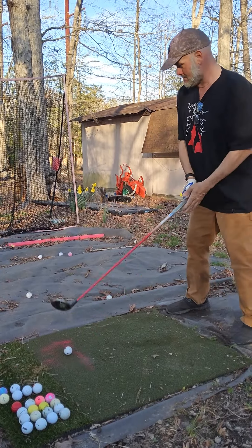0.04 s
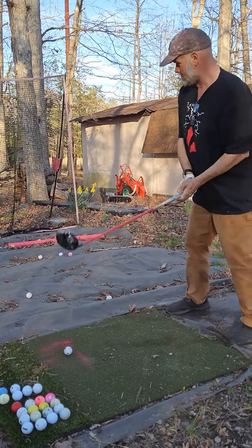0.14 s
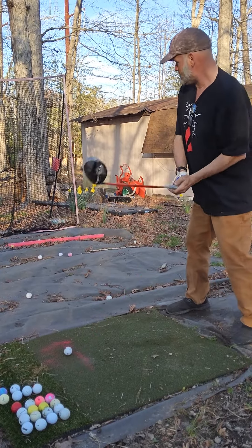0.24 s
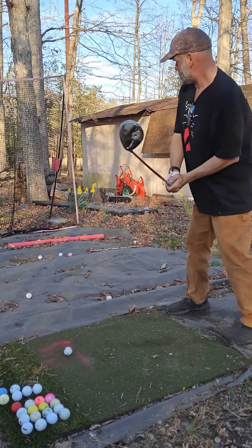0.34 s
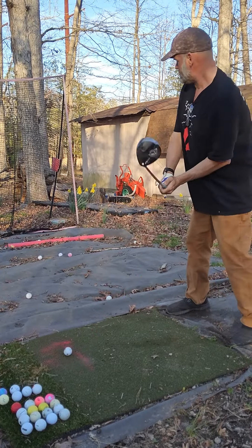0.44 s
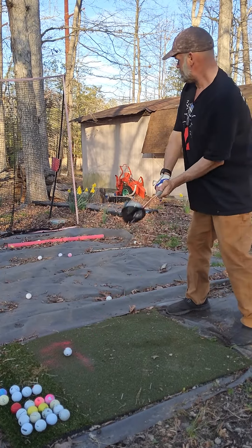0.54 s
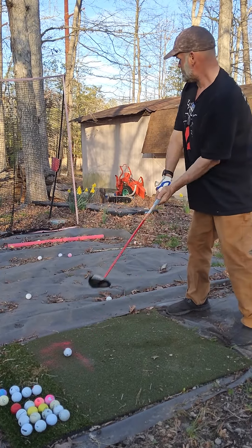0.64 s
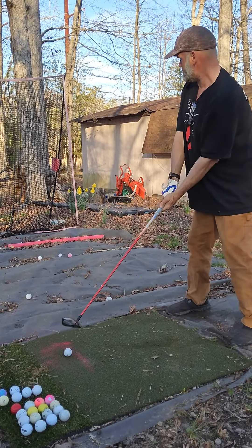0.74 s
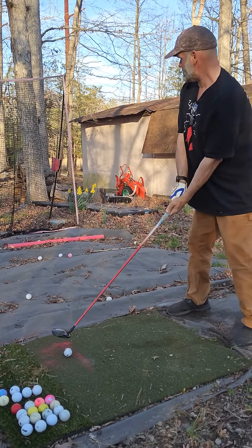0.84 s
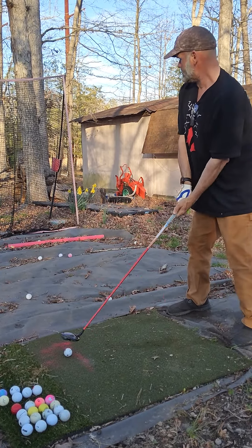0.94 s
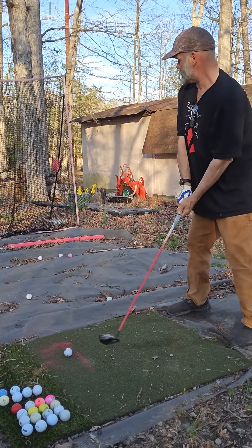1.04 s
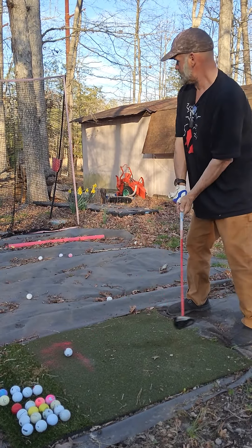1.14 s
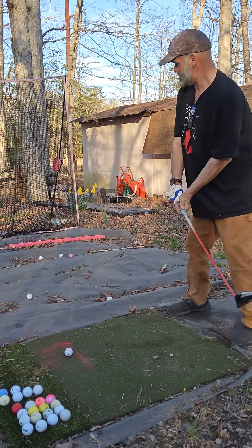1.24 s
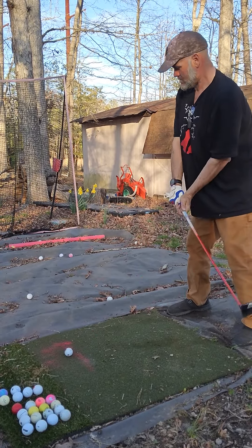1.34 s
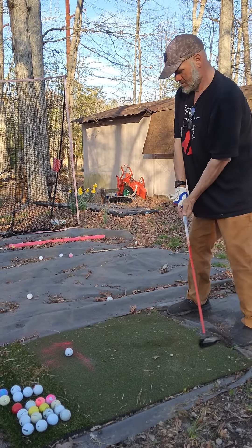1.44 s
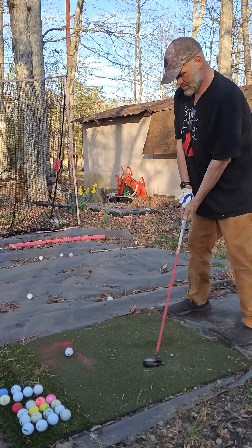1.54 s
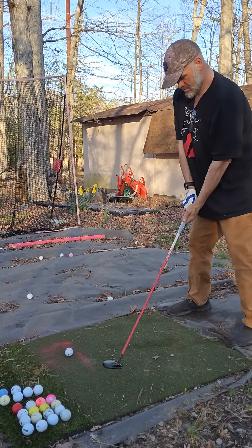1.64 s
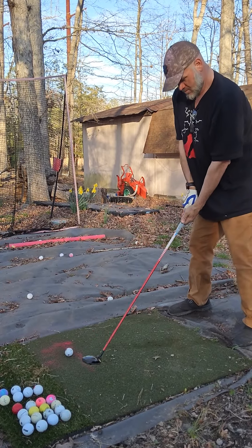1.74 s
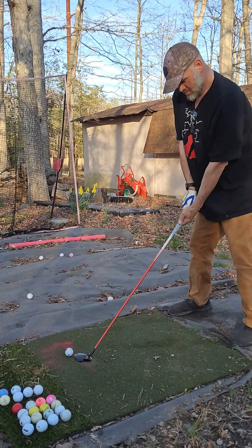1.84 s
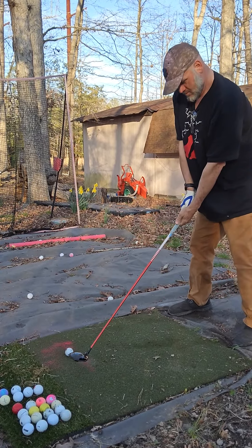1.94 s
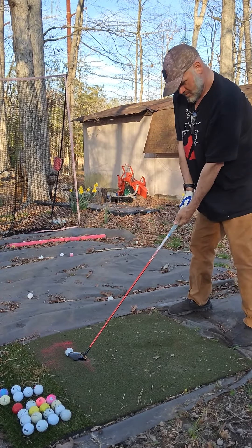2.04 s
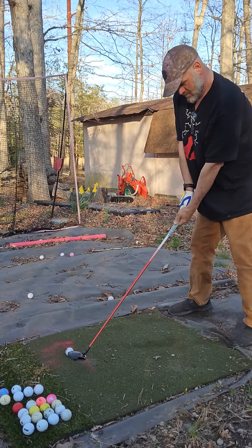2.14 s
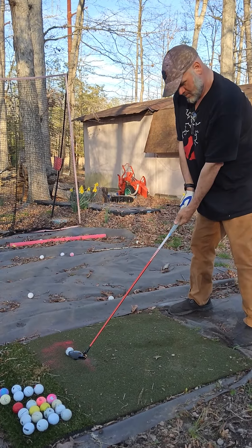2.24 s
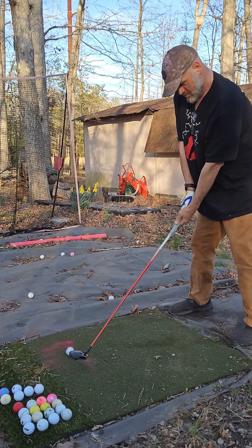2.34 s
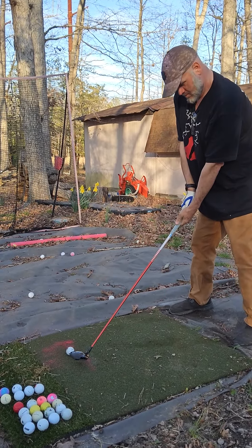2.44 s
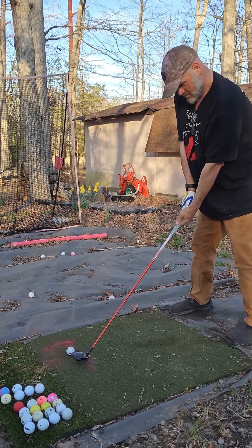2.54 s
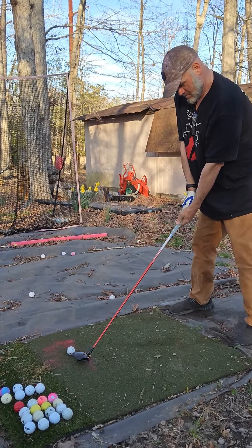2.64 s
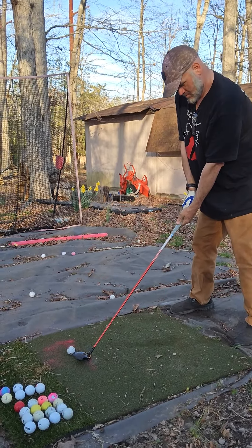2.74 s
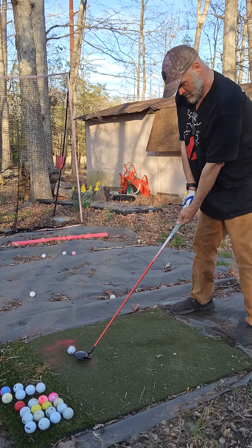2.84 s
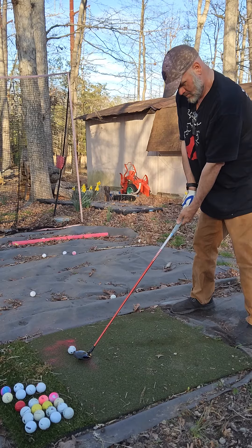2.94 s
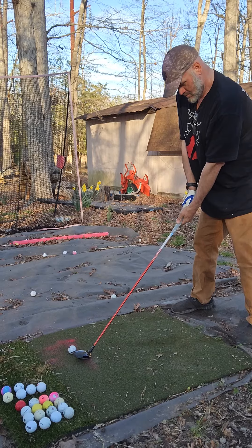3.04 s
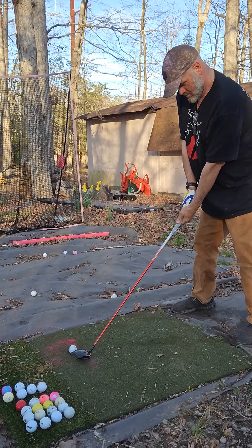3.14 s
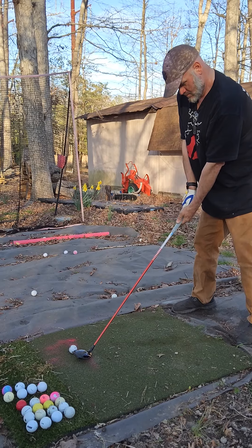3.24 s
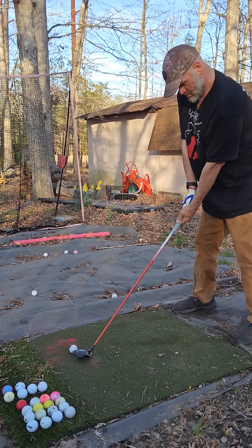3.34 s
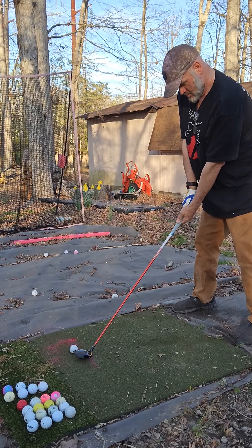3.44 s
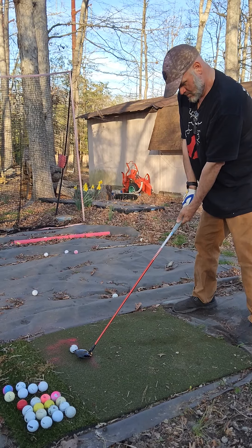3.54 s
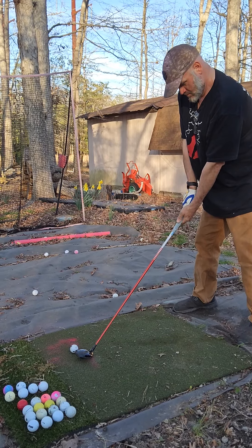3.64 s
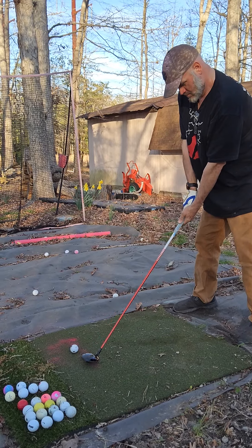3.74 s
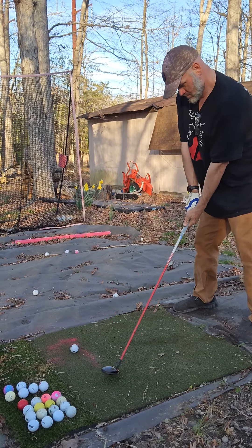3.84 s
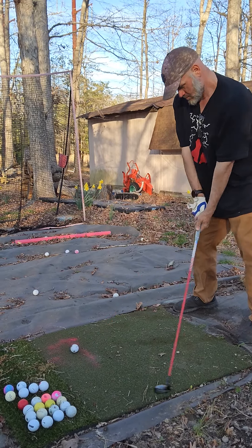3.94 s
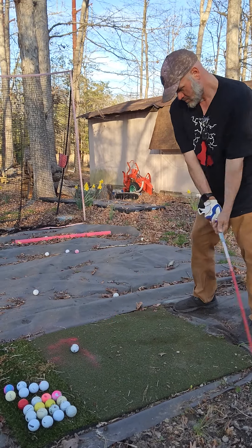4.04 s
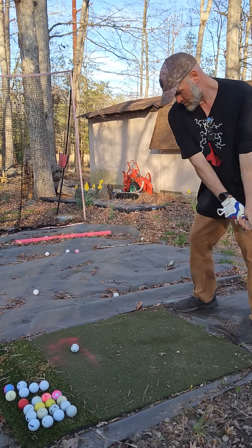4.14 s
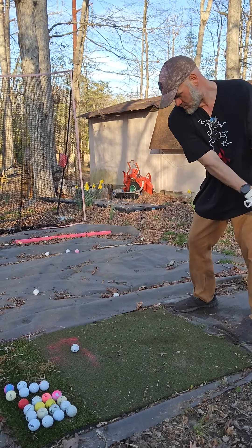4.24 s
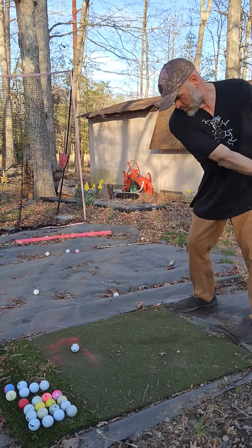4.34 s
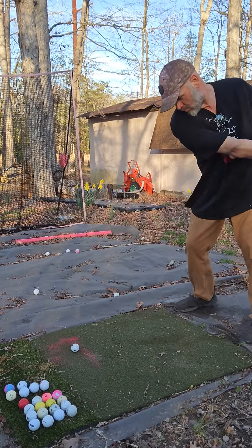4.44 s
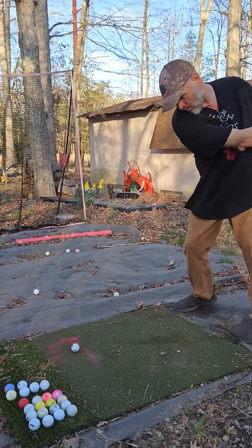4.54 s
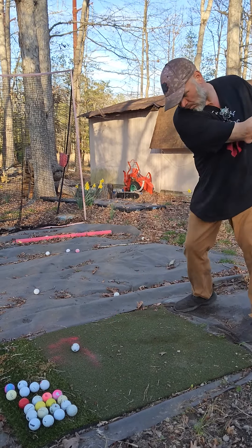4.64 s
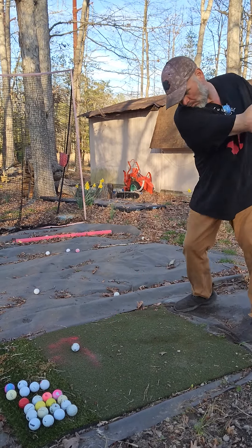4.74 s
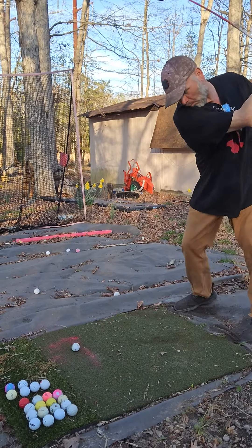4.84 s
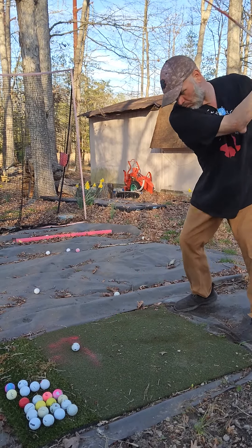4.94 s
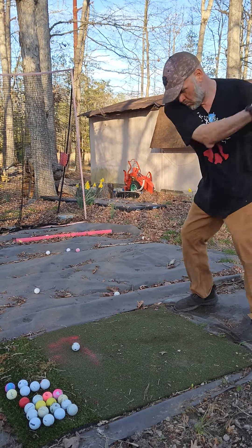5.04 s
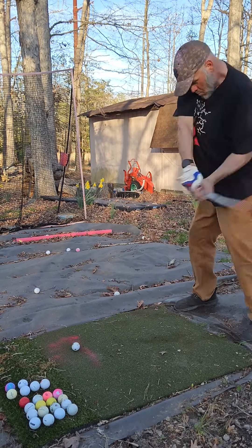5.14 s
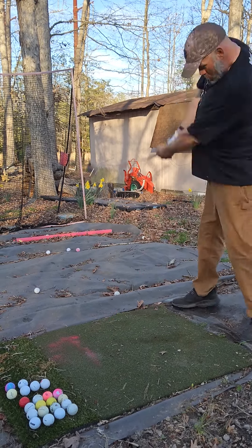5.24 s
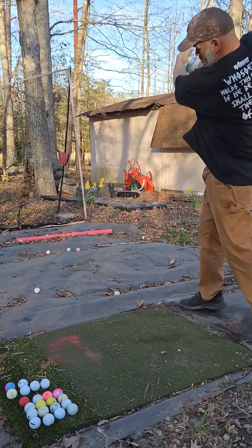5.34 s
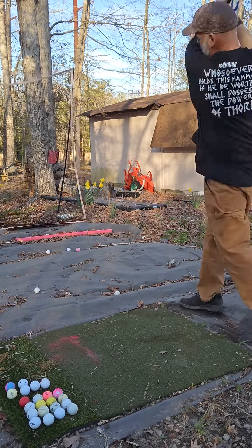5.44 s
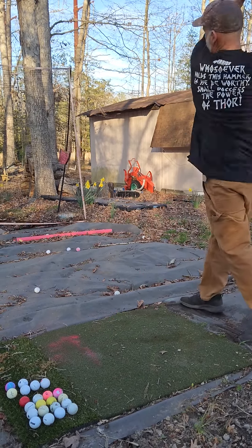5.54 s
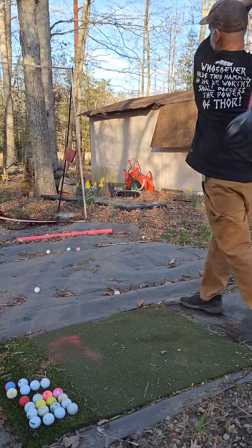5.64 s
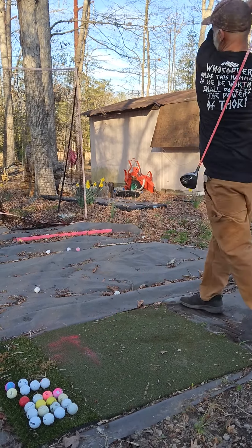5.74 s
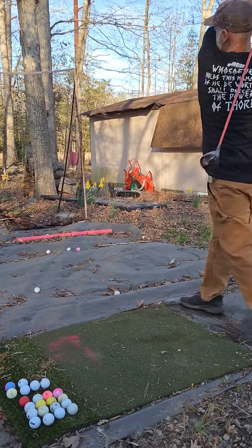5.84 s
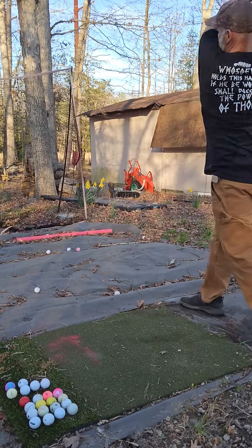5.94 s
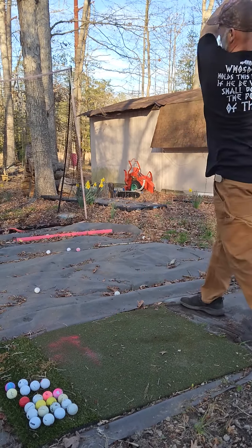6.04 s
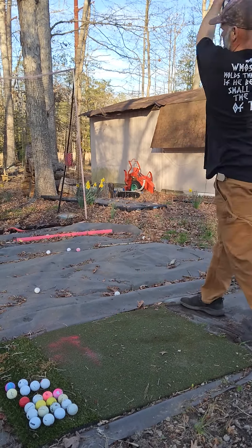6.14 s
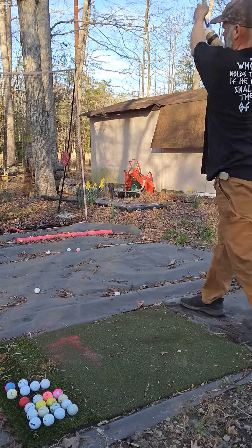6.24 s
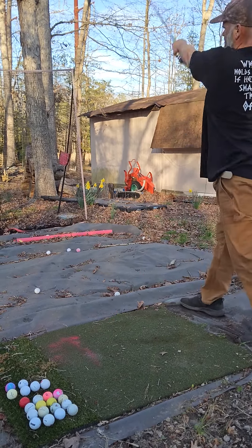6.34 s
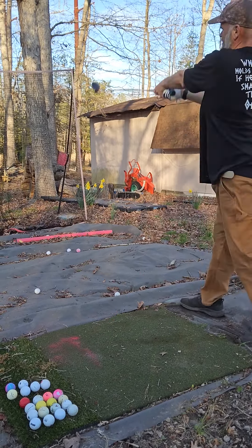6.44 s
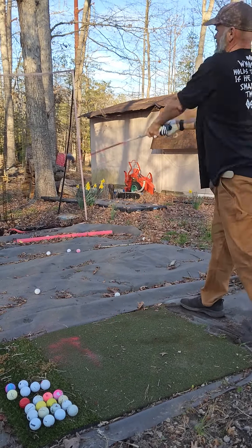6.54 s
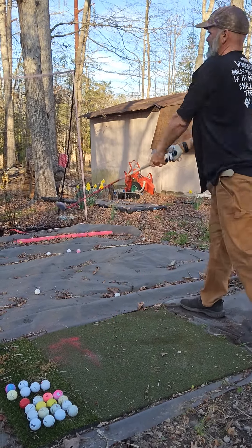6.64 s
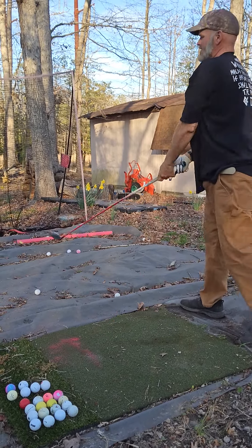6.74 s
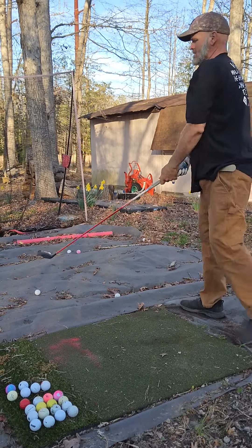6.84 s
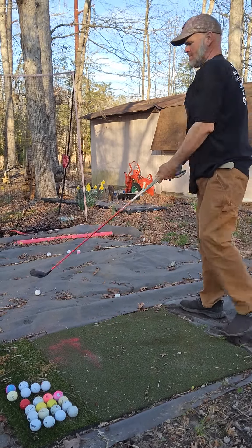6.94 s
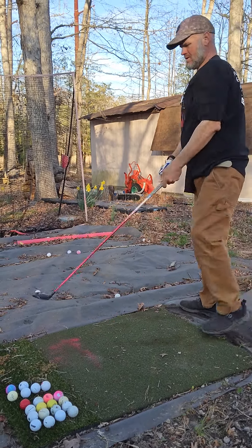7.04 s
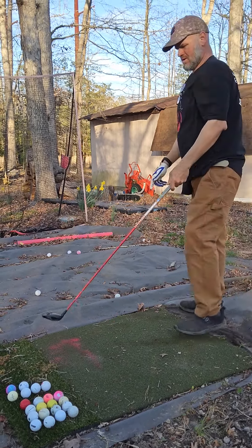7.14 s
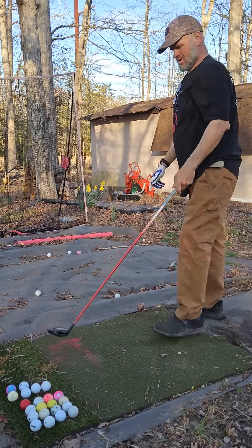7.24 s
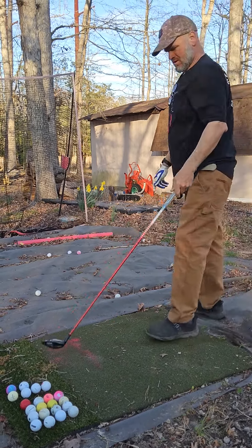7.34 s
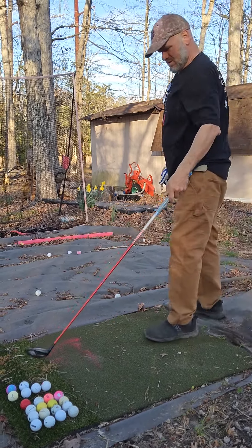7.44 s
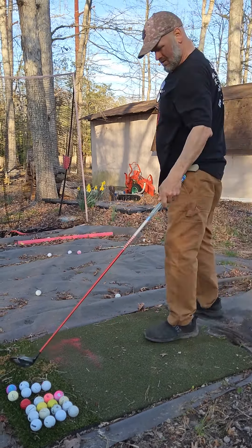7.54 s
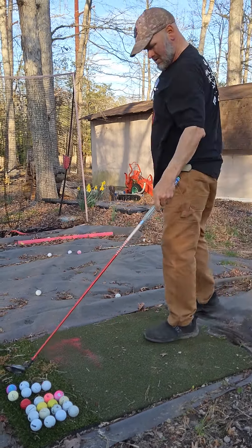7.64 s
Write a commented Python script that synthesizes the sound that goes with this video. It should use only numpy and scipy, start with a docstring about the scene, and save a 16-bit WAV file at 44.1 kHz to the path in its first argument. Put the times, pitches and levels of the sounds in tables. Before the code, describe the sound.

Faint birdsong and far-off traffic, then a quick golf swing, one sharp crack and a ball thumping into a rustling practice net.

```python
"""A golf club cracks a ball off a mat into a practice net in a wooded backyard.
The shaft whistles as it sheds vortices, the head thumps the mat, and the hit sets the hollow head ringing.
The net takes the ball with dull blows, rustles and lets it drop; cloth rubs and a shoe drags on turf.
Trunks and leaves scatter short echoes. Behind it all, birds trill, warble and whistle in gliding
pure tones over the drone of distant engines and tyres."""
import sys
import numpy as np
from scipy import signal
from scipy.fft import rfft, irfft, next_fast_len
from scipy.io import wavfile

SR = 44100
rng = np.random.default_rng(int(sys.argv[2]) if len(sys.argv) > 2 else 0)


def wav_record(signal):
    """Record a signal, one row per channel, as 16-bit PCM in the file named by sys.argv[1]."""
    frames = np.transpose(np.atleast_2d(signal))
    bounded = np.clip(frames, -1, 1)
    # unit amplitude maps onto the largest positive 16-bit level
    quanta = np.round(bounded * 32767).astype(np.int16)
    wavfile.write(sys.argv[1], SR, quanta)


N = 339129
TIME = np.arange(N) / SR
SWEEP_S, STRIKE_S = 5.2249, 5.2299   # the head meets the mat, then the ball

# Stereo image of two closely spaced microphones: frequency_hz, left_right_correlation
STEREO_IMAGE = [(60, 0.98), (200, 0.92), (400, 0.58), (700, .55), (1300, 0.096), (2600, -0.26),
                (5000, -0.12), (8000, -0.006), (15000, 0)]

# Noise colours, each an EQ curve: frequency_hz, relative_db
ROAD_RUMBLE_EQ = [(25, -21.5), (38, -4.5), (55, -1), (80, -0.5), (115, -3), (148, -8.5), (175, -17),
                  (260, -20), (320, -28.5), (420, -39)]
TYRE_EQ = [(190, -34.5), (330, -6.5), (452, -8), (744, -0.5), (996, 0), (1210, -4.5), (1370, -3.5),
           (1740, -15), (2440, -22.5), (3270, -24.5), (6000, -39), (7800, -66.5), (13200, -120)]
MIC_HISS_EQ = [(3000, -1.5), (5000, 4), (9000, -1), (13000, 2), (16000, 1)]
CLOTH_EQ = [(900, -14), (1400, -4), (2000, -10.5), (2600, -10.5), (3300, -4), (4300, -5), (5100, -1),
            (6200, -7.5), (8300, -9), (9700, -7), (11000, -10.5), (15500, -11)]
SCUFF_EQ = [(400, -13.5), (650, -7), (950, -4.5), (1600, -4.5), (2600, -7.5), (4200, -14), (5100, -13.5),
            (9000, -26), (15000, -34)]
NET_SHIVER_EQ = [(150, -28), (250, -2.5), (347, -5), (420, -10.5), (929, -3), (1510, -4), (2760, -2.5),
                 (3890, -3.5), (5790, -3), (9390, -5.5), (15500, -12.5)]
NET_SLIDE_EQ = [(240, -17), (400, -10), (560, -6.5), (1200, -3), (1510, -6.5), (1880, -3.5), (3360, -5),
                (3680, -5.5), (9650, -3.5), (15500, -11)]
SWING_AIR_EQ = [(590, -31), (1000, 0.5), (1350, -4.5), (4290, -12), (7610, -26), (8340, -31), (9910, -22.5),
                (15500, -29.5)]
CRACK_SCATTER_EQ = [(300, -4), (1800, 3.5), (3400, -1.5), (6000, -1), (10500, -4.5), (15500, -7.5)]

# Distant engines pass by: nearest_s, time_to_half_power_s, level_db
ENGINE_PASSES = [(.9, .35, -59.5), (2.05, 0.64, -59), (3.5, .6, -61.5), (7.3, 0.27, -63.5)]
# Far birds' falling whistles: start_s, length_s, top_hz, pitch_drop_fraction, relative_db
FAR_WHISTLES = [(0.301, 0.11, 3420, 0.038, -83), (0.469, 0.15, 3160, .03, -86.5),
                (0.793, .11, 3394, 0.057, -78), (1.253, 0.11, 3410, 0.085, -79.5),
                (1.69, 0.12, 3420, 0.065, -77.5), (2.135, 0.12, 3470, 0.15, -73),
                (2.39, .13, 1907, 0.028, -71.5), (2.567, .1, 3480, 0.063, -82),
                (2.939, 0.21, 3190, .17, -76.5), (3.6, .13, 2376, 0.029, -79),
                (4.021, 0.15, 3306, 0.19, -80), (4.16, .13, 2760, .01, -82.5)]
# A nearer bird's slurred syllables: start_s, length_s, first_hz, last_hz, relative_db, vibrato_fraction
WARBLE_SYLLABLES = [(4.793, .045, 2400, 2660, -70.5, .08), (4.84, .054, 2330, 1980, -70, .025),
                    (5.01, .034, 2720, 2220, -67.5, .01), (5.062, .03, 2090, 2160, -68, .03)]
# Contour of one trill note: length_fraction, top_pitch_fraction, relative_db
TRILL_CONTOUR = [(0, .58, -19), (.21, .68, -4), (.4, .93, -7), (.64, 1, 3.5), (1, .96, -6)]

# Cloth rubs as the golfer winds up, lowers the club, turns, settles and steps: full_s, hold_s, relative_db
CLOTH_MOVES = [(4.56, 0.15, -88.5), (5.0, 0.15, -88.5), (6.22, 0.24, -76), (6.58, .26, -69),
               (6.96, .07, -82), (7.18, 0.071, -66.5), (7.22, .01, -63)]
# A sole drags over the turf: full_s, hold_s, relative_db
SHOE_SCUFFS = [(7.395, 0.034, -59), (7.5, .07, -64.5), (7.65, .04, -67)]
# Snaps of net, dry leaves, twigs and cloth: start_s, relative_db, body_hz, body_gain_db, t60_s
DRY_SNAPS = [(4.044, -68.5, 9390, -2.5, .087), (5.314, -33, 3070, 5, 0.15),
             (5.3287, -32.5, 1580, 1.5, 0.05), (5.897, -43.5, 2500, -13, 0.058),
             (6.0375, -35, 9000, 4.5, 0.018), (6.0402, -37.5, 420, 1.5, 0.027),
             (6.1717, -51.5, 6000, 8, 0.0072), (6.628, -58, 12000, 10, .012),
             (6.7252, -49.5, 3940, -8, 0.0094), (6.8002, -40, 1250, -0.5, 0.015),
             (6.896, -56, 1492, 1.5, 0.035), (7.272, -53, 6950, -3.5, .012), (7.39, -60, 1800, 0, 0.036)]

# The ball drives in, the net billows and snaps taut, the ball lands: start_s, peak_db, pitch_hz, t60_s
BALL_BLOWS = [(5.308, -29.5, 706, 0.019), (5.3083, -24.5, 71, 0.17), (5.3162, -17, 130, 0.013),
              (5.318, -24.5, 850, 0.02), (5.3286, -23, 740, 0.028), (5.528, -41.5, 70.4, .3),
              (6.0395, -44, 330, 0.048)]
# The shaken net swings back ever more weakly: full_s, hold_s, relative_db
NET_SWINGS = [(5.25, 0.13, -38.5), (5.425, 0.01, -49), (5.64, 0.023, -58.5), (5.72, .005, -64)]
# The ball slips, slides down the netting and lands in the slack: full_s, hold_s, relative_db
BALL_SLIDES = [(5.82, .01, -60.5), (5.865, 0.12, -54), (5.895, 0.017, -51.5), (6.045, 0.0061, -52)]

# The shaft's vortex tone and air hiss through the downswing: time_s, pitch_hz, tone_db, hiss_db
DOWNSWING = [(5.122, 380, -72, -87), (5.14, 462, -55, -72), (5.154, 535, -43, -63),
             (5.163, 625, -27.5, -52), (5.185, 680, -27.5, -38.5), (5.2, 742, -25, -38),
             (5.217, 722, -23, -43.5), (5.223, 686, -40.5, -48), (5.235, 602, -69.5, -59)]
# Instants when the swish's tone briefly drops out: time_s
SWISH_DIPS = [5.1785, 5.191, 5.211]
# Modes of the hollow club head and ball: pitch_hz, relative_db, t60_s
HEAD_MODES = [(1390, -20, .017), (1950, -18, .011), (2330, -19, .015), (2800, -23, .011), (4300, -22, .014),
              (5420, -18, .026), (6150, -23, .007), (6840, -13, .012), (7400, -20, .008), (9230, -19, .009),
              (9760, -18, .011), (10500, -16, .021), (10800, -21, .012), (12350, -23, .013),
              (13600, -24, .018), (15300, -26, .012)]


def from_db(db):
    """Decibels to gain."""
    return np.exp(np.asarray(db) * (np.log(10) / 20))


def unit_rms(x):
    """Normalise to an rms of one."""
    return x / np.sqrt(np.mean(x ** 2) + 1e-20)


def gate(rows, fade_s=0.013):
    """Open from the first row's time to the last, with a fade just outside each end."""
    first_s, last_s = rows[0][0], rows[-1][0]
    return np.interp(TIME, [first_s - fade_s, first_s, last_s, last_s + fade_s], [0, 1, 1, 0])


def decay(start_s, t60_s):
    """An envelope with an instant attack that falls 60 dB in t60_s."""
    return (TIME >= start_s) * from_db(-60 * np.clip((TIME - start_s) / t60_s, 0, 4))


def swell(full_s, rise_s, hold_s, t60_s):
    """An envelope that climbs 20 dB per rise_s up to one, holds, and falls 60 dB in t60_s."""
    t = TIME - full_s
    return from_db(20 * np.clip(t / rise_s, -10, 0) - 60 * np.clip((t - hold_s) / t60_s, 0, 4))


def band(x, low_hz, high_hz):
    """Band-pass filter."""
    sos = signal.butter(2, [low_hz, min(high_hz, .45 * SR)], "band", fs=SR, output="sos")
    return signal.sosfilt(sos, x + 1e-18)


def drift(rate_hz):
    """A random modulator with an rms of one."""
    knots = rng.standard_normal(int(TIME[-1] * rate_hz) + 2)
    return unit_rms(np.interp(TIME * rate_hz, np.arange(len(knots)), knots))


def noise(eq):
    """Diffuse stereo noise at unit rms, shaped by an EQ curve and rolled off steeply past its ends."""
    size = next_fast_len(N, True)
    log_hz = np.log(np.maximum(np.fft.rfftfreq(size, 1 / SR), 1))
    eq_hz, eq_db = np.transpose(eq)
    beyond = np.abs(log_hz - np.clip(log_hz, np.log(eq_hz[0]), np.log(eq_hz[-1])))
    gain = from_db(np.interp(log_hz, np.log(eq_hz), eq_db) - 40 * beyond)
    image_hz, correlation = np.transpose(STEREO_IMAGE)
    alike = np.interp(log_hz, np.log(image_hz), correlation)
    mid, side = rfft(rng.standard_normal((2, size)))
    stereo = np.sqrt(1 + alike) * mid + np.sqrt(1 - alike) * side * [[1], [-1]]
    return unit_rms(irfft(gain * stereo, size)[:, :N])


def ring(start_s, hz, t60_s):
    """A struck mode: one decaying sine."""
    return decay(start_s, t60_s) * np.sin(2 * np.pi * hz * (TIME - start_s))


def from_tee(x, pan_db, lag_s):
    """Sound from the tee reaches the right microphone first; positive pan_db favours the left."""
    left = np.interp(TIME - lag_s, TIME, x)
    return np.array([left * from_db(pan_db / 2), x * from_db(-pan_db / 2)])


def woods(x, t60_s, build_s, top_hz):
    """Yard reverb: trunks, shed and leaves scatter a diffuse echo that builds and dies away."""
    t = TIME[:SR]
    envelope = from_db(-60 * t / t60_s) * (1 - np.exp(-t / build_s))
    impulse = unit_rms(band(rng.standard_normal((2, SR)), 250, top_hz) * envelope) / np.sqrt(SR)
    return signal.fftconvolve(np.atleast_2d(x), impulse, axes=1)[:, :N]


def mic_hiss(level_db=-88):
    """The microphones' faint noise floor."""
    return from_db(level_db) * noise(MIC_HISS_EQ)


def traffic(engine_hz=78, road_db=-55.5, pass_rumble_db=5, tyres_db=-63, fade_db_per_s=1.38, pan_db=.07):
    """Engines swell and fade with distance, lifting the road's rumble; the tyre wash slowly recedes."""
    powers = [from_db(db) ** 2 / (1 + ((TIME - s) / half_s) ** 2) for s, half_s, db in ENGINE_PASSES]
    passing = np.sqrt(sum(powers))
    phase = 2 * np.pi * np.cumsum(engine_hz * (1 + .04 * drift(5))) / SR
    hum = np.sin(phase) + 0.65 * np.sin(2 * phase) + 0.16 * np.sin(3 * phase)
    engines = passing * from_db(1.7 * drift(8.1)) * hum
    rumble = np.hypot(from_db(road_db), from_db(pass_rumble_db) * passing) * noise(ROAD_RUMBLE_EQ)
    tyres = from_db(tyres_db - fade_db_per_s * TIME) * noise(TYRE_EQ)
    return (engines + rumble + tyres) * from_db([[pan_db / 2], [-pan_db / 2]])


def chorus(level_db=-77):
    """Many birds far off merge into a narrow wash that dies away early."""
    envelope = swell(0, rise_s=.01, hold_s=2.35, t60_s=1.8)
    return from_db(level_db) * envelope * noise([(1500, -1), (1750, 1.5), (1920, -1.5), (2100, -24)])


def bird_note(rows, bend, fade_s):
    """A pure tone along rows of time_s, pitch_hz, level_db; bend shifts the pitch by a fraction."""
    s, hz, db = np.transpose(rows)
    envelope, note = gate(rows, fade_s), np.zeros(N)
    on = envelope > 0
    phase = 2 * np.pi * np.cumsum(np.interp(TIME[on], s, hz) * (1 + bend[on])) / SR
    note[on] = np.sqrt(2) * from_db(np.interp(TIME[on], s, db)) * envelope[on] * np.sin(phase)
    return note


def far_whistles(quaver, fade_db=12):
    """Each far call starts high and strong, then sinks and fades."""
    return sum(bird_note([(s, hz, db), (s + length_s, hz * (1 - drop), db - fade_db)], quaver, .011)
               for s, length_s, hz, drop, db in FAR_WHISTLES)


def warble(quaver, vibrato_hz=42):
    """Each syllable glides from one pitch to another under a fast vibrato."""
    song = 0
    for s, length_s, first_hz, last_hz, db, depth in WARBLE_SYLLABLES:
        vibrato = depth * np.cos(2 * np.pi * vibrato_hz * (TIME - s))
        song += bird_note([(s, first_hz, db), (s + length_s, last_hz, db)], quaver - vibrato, .006)
    return song


def trill(quaver, start_s=2.128, gap_s=.119, quicken_s=.0014, note_s=.047, top_hz=3300, sink_hz=18.7):
    """A run of thirteen slightly uneven notes, each a little sooner and lower than the last."""
    song = 0
    for k, db in enumerate(-76 + 0.5 * rng.standard_normal(13)):
        onset_s = start_s + gap_s * k - quicken_s * k ** 2 / 2
        peak_hz = top_hz - sink_hz * k
        rows = [(onset_s + along * note_s, peak_hz * pitch, db + accent_db)
                for along, pitch, accent_db in TRILL_CONTOUR]
        song += bird_note(rows, quaver, fade_s=.012)
    return song


def birds():
    """Three voices in the trees: the farther the bird, the more of it arrives as reverb."""
    quaver = .018 * drift(220)
    trilled, warbled, far = trill(quaver / 2), warble(quaver / 2), far_whistles(quaver)
    direct = from_db(-2) * trilled + from_db(-2.5) * warbled + from_db(-4) * far
    send = from_db(-9) * trilled + from_db(-5) * warbled + from_db(-4.5) * far
    return direct + woods(send, t60_s=0.33, build_s=0.0093, top_hz=8000)


def rustle(strokes, eq, rise_s, t60_s, grain_db, grain_hz, surge_db):
    """With each stroke, fibres catch and slip in small clumps and uneven surges, then settle."""
    power = sum((from_db(db) * swell(s, rise_s, hold_s, t60_s)) ** 2 for s, hold_s, db in strokes)
    grains = unit_rms(from_db(grain_db * drift(grain_hz) + surge_db * drift(60)))
    return np.sqrt(power) * grains * noise(eq)


def golfer(cloth_gain_db=4.5, scuff_gain_db=3):
    """Body foley: cloth rubs and a shoe drags over turf."""
    cloth = rustle(CLOTH_MOVES, CLOTH_EQ, rise_s=.035, t60_s=.45,
                   grain_db=2.5, grain_hz=830, surge_db=1.6)
    scuffs = rustle(SHOE_SCUFFS, SCUFF_EQ, rise_s=.062, t60_s=.69,
                    grain_db=2.5, grain_hz=500, surge_db=.7)
    return from_db(cloth_gain_db) * cloth + from_db(scuff_gain_db) * scuffs


def snaps(gain_db=-5.5):
    """Net, leaves, twigs and cloth snap: a tick of a few cycles and a bright burst around its pitch."""
    crackle = noise([(1100, 9), (2000, 4.5), (6000, -2), (15500, -15)])
    white, mix = rng.standard_normal(N), 0
    for s, db, hz, body_db, t60_s in DRY_SNAPS:
        body = from_db(body_db - 2) * unit_rms(band(white, hz / 1.31, hz * 1.43))
        burst = decay(s, t60_s) * (crackle + body)
        tick = from_db(body_db) * ring(s, hz, t60_s=10 / hz)
        mix += from_db(db + gain_db) * (burst + tick)
    return mix


def net(shiver_gain_db=2, slide_gain_db=3.5):
    """The net takes the ball with dull blows, shivers, and lets it run down."""
    blows = sum(from_db(db) * ring(s, hz, t60_s) for s, db, hz, t60_s in BALL_BLOWS)
    shiver = rustle(NET_SWINGS, NET_SHIVER_EQ, rise_s=.02, t60_s=.68,
                    grain_db=1.5, grain_hz=630, surge_db=.4)
    slide = rustle(BALL_SLIDES, NET_SLIDE_EQ, rise_s=.046, t60_s=.32,
                   grain_db=1.5, grain_hz=830, surge_db=.7)
    return blows + from_db(shiver_gain_db) * shiver + from_db(slide_gain_db) * slide


def swish(wander=0.031, flutter_db=1.5, wake_db=-13.5, dip_s=.0018):
    """The shaft's vortices sing higher as it speeds up; the head drags a noisy wake."""
    times_s, *curves = np.transpose(DOWNSWING)
    hz, tone_db, hiss_db = [np.interp(TIME, times_s, curve) for curve in curves]
    phase = 2 * np.pi * np.cumsum(hz * (1 + wander * drift(150))) / SR
    # through each dip the tone shrinks to nothing and returns with its polarity flipped
    dips = np.prod([np.tanh((TIME - s) / dip_s) for s in SWISH_DIPS], axis=0)
    tone = np.sqrt(2) * from_db(tone_db + flutter_db * drift(120)) * dips * np.sin(phase)
    wake = from_db(tone_db + wake_db) * unit_rms(band(rng.standard_normal(N), 140, 520))
    air = from_db(hiss_db) * noise(SWING_AIR_EQ)
    return (from_tee(tone + wake, pan_db=1, lag_s=0.000074) + air) * gate(DOWNSWING)


def mat_sweep(thump_db=-10, thump_hz=390, width_s=0.0012, brush_db=-29):
    """The head skims the mat: one short pressure wave and a brush of turf fibres."""
    t = TIME - SWEEP_S
    thump = from_db(thump_db) * np.exp(-(t / width_s) ** 2) * np.cos(2 * np.pi * thump_hz * t)
    fibres = unit_rms(band(rng.standard_normal((2, N)), 900, 15000))
    brush = from_db(brush_db) * decay(SWEEP_S, t60_s=0.11) * fibres
    return from_tee(thump, pan_db=0, lag_s=0.00018) + brush


def crack_tail(level_db=-31, t60_s=.3):
    """Countless trunks and leaves return the crack as a smooth dying hiss."""
    return from_db(level_db) * decay(STRIKE_S + .003, t60_s) * noise(CRACK_SCATTER_EQ)


def strike(ring_gain_db=-1.8, click_db=-1.5, knock_db=-20, scatter_db=-24):
    """A half-millisecond contact knocks the ball and rings the head; the ground scatters the crack."""
    modes = sum((-1) ** k * from_db(db) * ring(STRIKE_S, hz, t60_s)
                for k, (hz, db, t60_s) in enumerate(HEAD_MODES))
    click = from_db(click_db) * ring(STRIKE_S, hz=7200, t60_s=0.00057)
    knock = from_db(knock_db) * ring(STRIKE_S - .0004, hz=1750, t60_s=0.0053)
    scatter = from_db(scatter_db) * decay(STRIKE_S, t60_s=0.085) * noise(CRACK_SCATTER_EQ)
    head = from_tee(from_db(ring_gain_db) * modes - click, pan_db=4, lag_s=4 / SR)
    ball = from_tee(knock, pan_db=-1.5, lag_s=4 / SR)
    return head + ball + scatter


def scene(swing_send_db=-21, snap_send_db=-10):
    """The mix: the shot and its echo up front, then net and foley, over the backyard ambience."""
    swing, snapping = swish() + mat_sweep(), snaps()
    send = from_db(swing_send_db) * swing + from_db(snap_send_db) * snapping
    echo = woods(send, t60_s=0.15, build_s=0.0037, top_hz=11060)
    shot = swing + strike() + crack_tail()
    foley = snapping + net() + golfer()
    ambience = birds() + chorus() + traffic() + mic_hiss()
    return shot + echo + foley + ambience


def record(dry, low_cut_hz=30, high_cut_hz=15850):
    """Output chain: trim the deepest bass, clip at full scale, then cut the top steeply."""
    low_cut = signal.butter(2, low_cut_hz, "high", fs=SR, output="sos")
    high_cut = signal.ellip(12, .2, 70, high_cut_hz, fs=SR, output="sos")
    clipped = np.clip(signal.sosfilt(low_cut, dry), -1, 1)
    return signal.sosfilt(high_cut, clipped)


dry = scene()
out = record(dry)
wav_record(out)
```